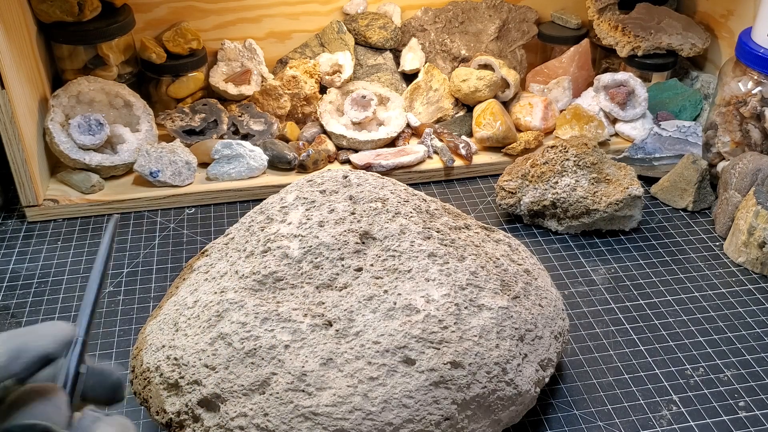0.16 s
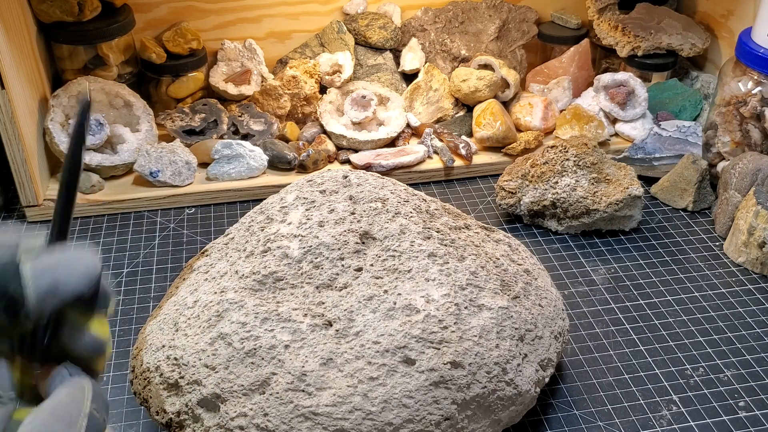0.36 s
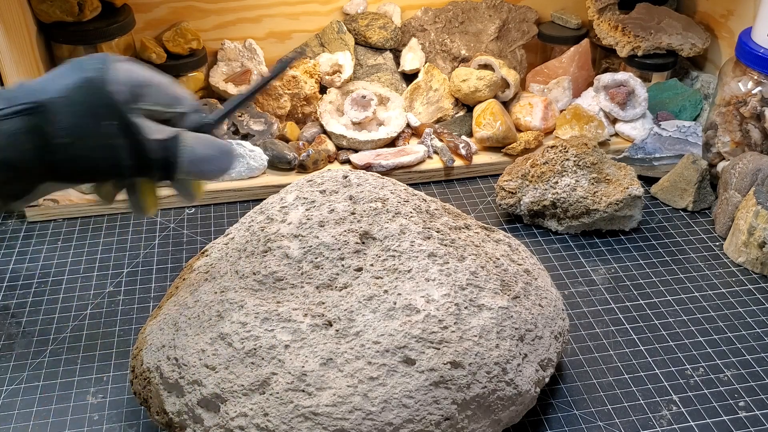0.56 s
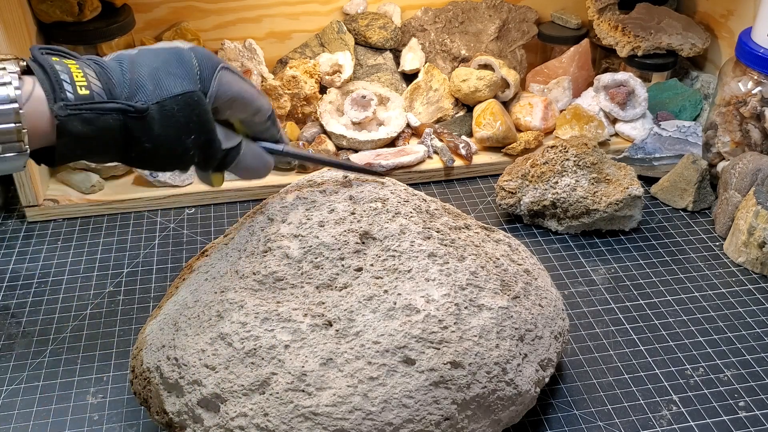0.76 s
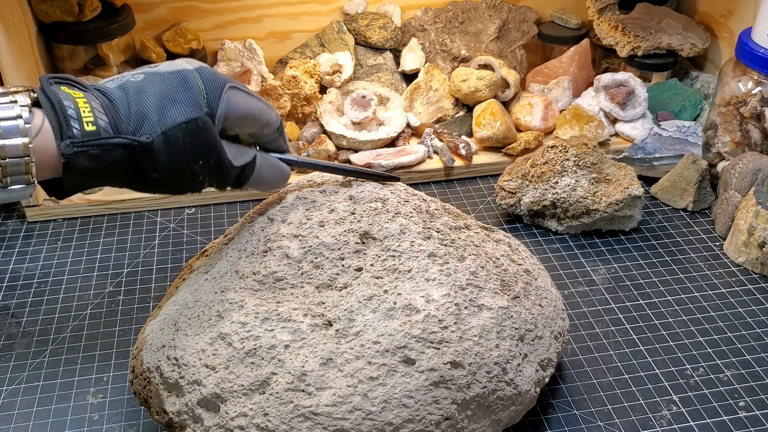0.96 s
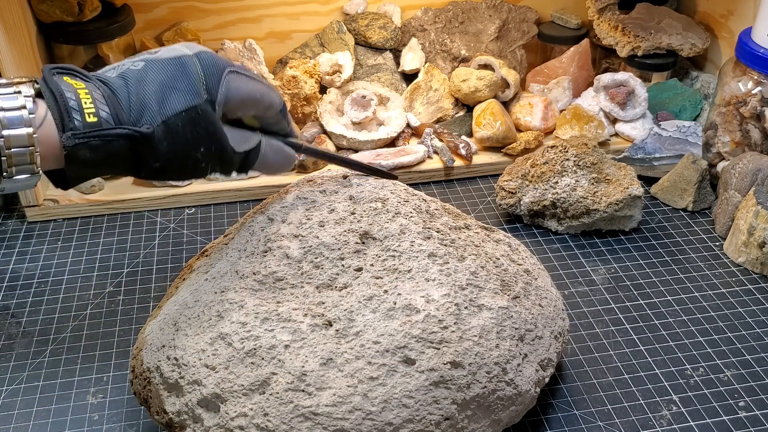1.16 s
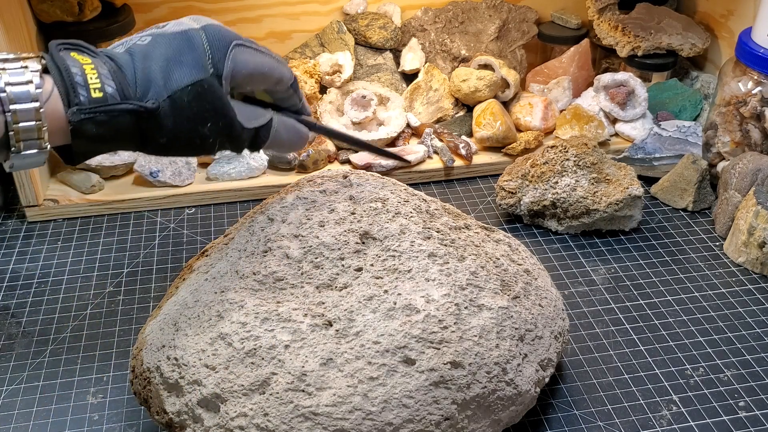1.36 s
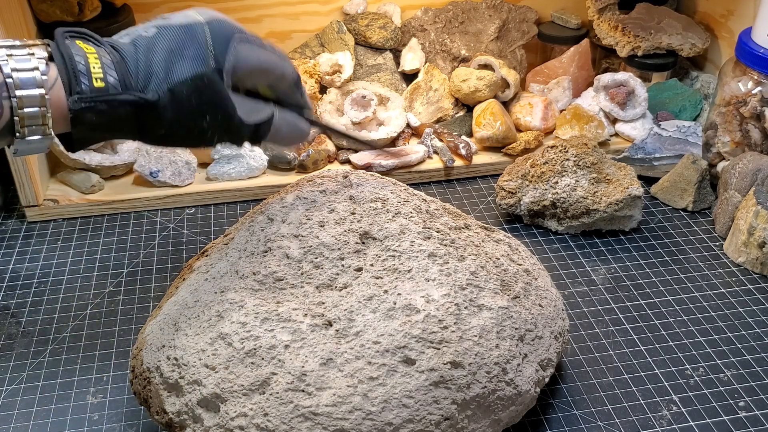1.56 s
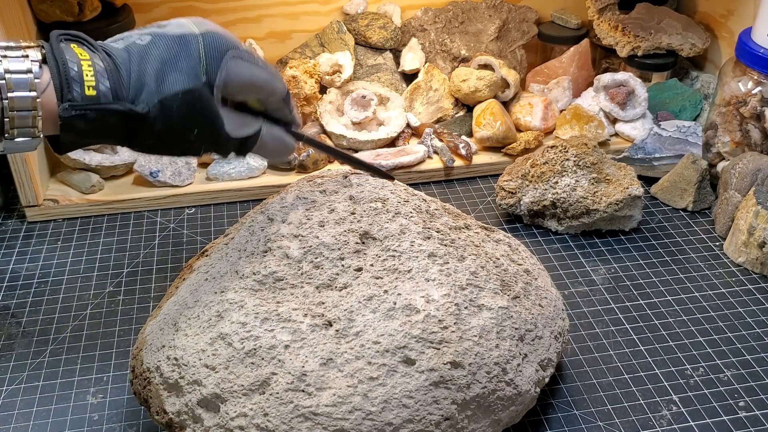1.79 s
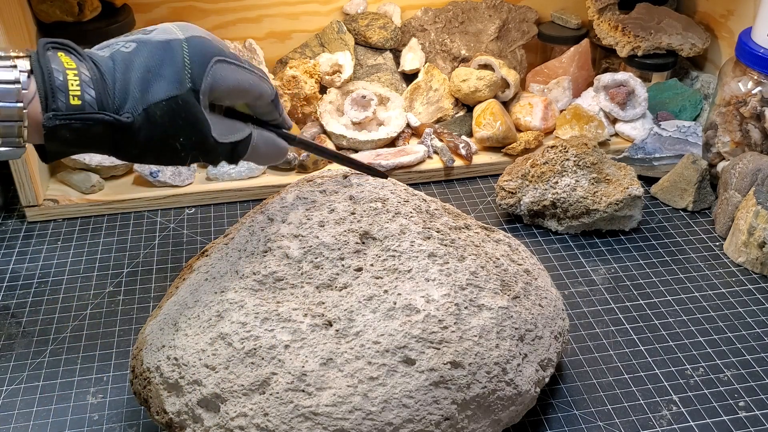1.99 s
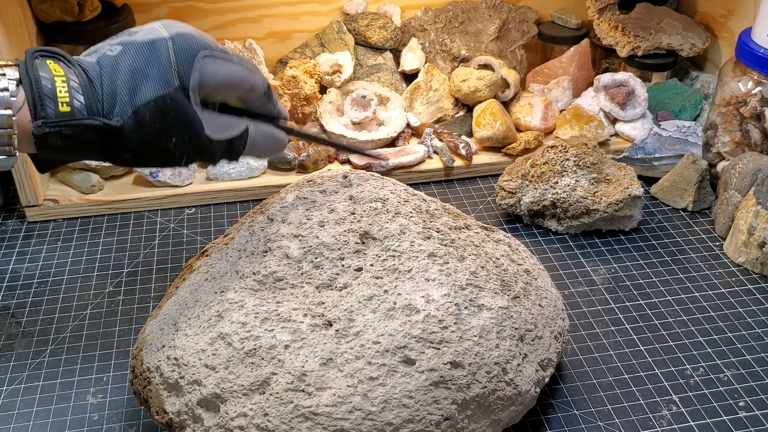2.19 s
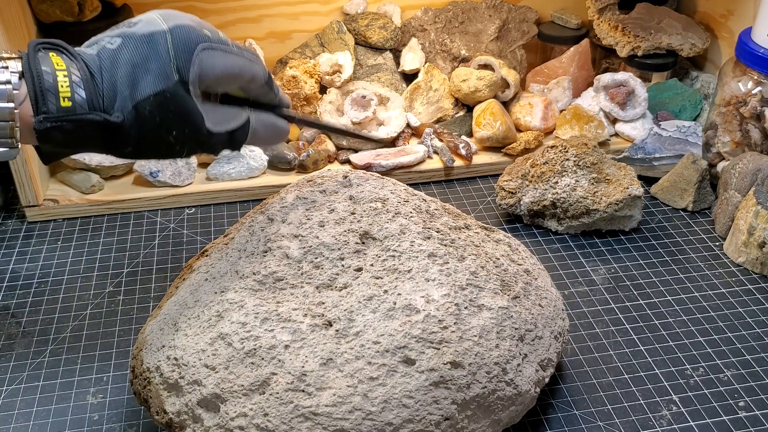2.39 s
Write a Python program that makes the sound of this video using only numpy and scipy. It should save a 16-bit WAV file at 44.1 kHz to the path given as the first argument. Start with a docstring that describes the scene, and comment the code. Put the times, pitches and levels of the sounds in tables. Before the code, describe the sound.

Thin metal rod taps a porous rock, one loud clink then uneven softer tinny taps

```python
"""A thin steel tool taps a large porous rock on a workbench in a small workshop.
A strong tap opens over low room rumble and hiss: filtered noise cracks, decaying sines knock, clink and ring.
From 0.25 s a glove and watch strap rustle: grained noise under short band-noise ticks.
From 0.83 s nine more taps follow to 2.36 s, with two faint ticks among them.
Grit, knock, rings and ticks also feed a noise-like room tail."""
import sys
import numpy as np
from scipy import signal
from scipy.fft import rfft, irfft
from scipy.io import wavfile
from scipy.ndimage import uniform_filter1d

SR = 44100
rng = np.random.default_rng(int(sys.argv[2]) if len(sys.argv) > 2 else 0)


def voltage_ratio(level):
    """Linear amplitude factor for a level in decibels (scalar or array-like)."""
    return 10 ** (np.asarray(level, float) / 20)


def wrap_up_sound(samples):
    """Save the sound to the file named by the first command line argument, as 16-bit audio."""
    columns = np.atleast_2d(samples).T
    # keep every value between -1 and 1, then stretch to whole-number steps
    tamed = np.clip(columns, -1, 1)
    steps = np.round(tamed * 32767).astype(np.int16)
    wavfile.write(sys.argv[1], SR, steps)


N = 107383

# taps: start_s, crack_db, rock_db, tool_low_db, tool_high_db, rock_tilt_db_per_octave,
# crack_tilt_db_per_octave, thud_db, knock_db, grit_peak_hz, grit_peak_db; dB before direct and room gains
TAPS = [(-0.004, -31.5, -45, -24, -35.5, -11, 2, -64, -46, 5940, 2),
        (0.825, -62.5, -95, -56, -76, -28, 4, -70, -69, 5300, 5),
        (1.017, -50.5, -51, -36.5, -51.5, -1, -4, -41, -54, 4380, 7),
        (1.227, -41, -37.5, -33, -45.5, 2, -3, -36, -48.5, 3920, 9.5),
        (1.563, -47, -48.5, -45.5, -63, -8.5, -4, -70.5, -56, 11340, 11.5),
        (1.743, -50, -65.5, -53, -56, 11, 1, -83, -56.5, 9500, 4),
        (1.882, -48, -55.5, -52.5, -53, -5, 4, -71, -63, 5840, 14),
        (2.054, -48, -44.5, -50.5, -57, -2, -4, -68, -61, 8100, 9.5),
        (2.214, -43, -39.5, -41, -62, 5.5, -3, -62, -57, 4070, 7.5),
        (2.359, -47, -52.5, -49, -52, 6.5, -4, -66, -61.5, 7210, 5)]
# tilt of the tool's high modes, one per tap: tilt_db_per_octave
TOOL_HIGH_TILT = [17, 0, -7, 5, 22, -4, -4, -6, -11, 4]

# grit crack spectrum, before tilt and peak: freq_hz, density_db_per_hz
CRACK_SPECTRUM = [(400, -13), (1200, -10.5), (2600, -13.5), (3600, -10), (5000, -3), (7000, -8.5),
                  (9800, 2.5), (11500, -5.5), (14000, -17.5), (15000, -18), (15800, -56)]
CRACK_RISE_S, CRACK_T60_S, CRUMBLE_DB, CRUMBLE_T60_S = 0.0026, 0.03, -13, 0.14
GRIT_PEAK_OCTAVES = 0.31  # half-width at 1/e of the dB hump

# stony knock mode frequencies: mode_hz
KNOCK_HZ = [560, 700, 860, 1020]
# stony knock modes: relative_db, t60_s, rise_s
KNOCK_MODES = [(-6.5, .05, 0.0019), (-1, 0.055, 0.0024), (-0.5, 0.043, .002), (-6.5, 0.033, .002)]
# rock mode frequencies: mode_hz
ROCK_HZ = [1314, 2031, 2196, 2262, 2416, 2632, 3090, 3159, 3340, 3600, 3846, 4112, 4441, 4630, 4722, 5044,
           5502, 6305]
# rock modes, before tilt: relative_db, t60_s, rise_s
ROCK_MODES = [(-4, .3, 0.0021), (-9, .2, 0.0046), (8, 0.21, 0.016), (-10, 0.186, 0.014), (-8, .2, 0.0089),
              (-8.5, 0.13, .008), (-21.5, 0.23, .005), (-17.5, 0.161, .005), (-12.5, 0.19, 0.0019),
              (-14, 0.14, 0.0018), (-2.5, 0.11, 0.0029), (-14.5, 0.26, 0.0093), (-3.5, 0.1, 0.0047),
              (-18.5, 0.14, 0.0058), (-15, 0.14, .005), (-19.5, 0.085, .002), (-16.5, .08, 0.0026),
              (-20.5, 0.067, .002)]
# tool low mode frequencies: mode_hz
TOOL_LOW_HZ = [1454, 1456, 1426, 3160]
# tool low modes: relative_db, t60_s, rise_s
TOOL_LOW_MODES = [(4, 0.08, 0.0016), (-6, 0.32, .004), (-9.5, 0.066, .002), (-20.5, 0.21, 0.0012)]
# tool high mode frequencies: mode_hz
TOOL_HIGH_HZ = [5658, 7461, 9911, 9800, 13630, 13670]
# tool high modes, before tilt: relative_db, t60_s, rise_s
TOOL_HIGH_MODES = [(-11, 0.051, 0.00063), (-12, 0.13, .001), (-1, 0.142, 0.00076), (-1.5, .07, .001),
                   (0, .11, .001), (-8, 0.079, .001)]
# bench mode frequencies: mode_hz
BENCH_HZ = [84, 250]
# bench modes: relative_db, t60_s, rise_s
BENCH_MODES = [(4.5, .3, .003), (-30, .12, 0.0053)]
FLUTTER_RMS_DB = 4
DROP_AT_S, DROP_DB, DROP_WIDTH_S = 0.105, -13, 0.008  # low rings, time from the blow

# room decay: freq_hz, t60_s
ROOM_T60 = [(300, 0.32), (1500, 0.3), (4000, 0.18), (9000, 0.12), (15000, 0.083)]
ROOM_BUILD_S = 0.0021
NOISY_DIRECT_DB, NOISY_ROOM_DB = 5, 7
HIGH_ROOM_DB, RING_ROOM_DB, RUSTLE_ROOM_DB = -2, -13, -8

# rumble resonances: centre_hz, width_hz (full, at -6 dB), relative_db
RUMBLE_HUMPS = [(55.1, 14, 3.5), (80, 27, 0), (40, 20, -12.5), (111, 35, -11.5)]
# rumble level: time_s, level_db
RUMBLE_LEVEL = [(0.0, -35.5), (0.21, -47.5), (0.83, -42), (1.19, -47.5), (1.24, -42), (1.53, -54),
                (1.64, -44), (1.71, -55), (1.75, -43), (2.03, -50), (2.08, -45.5), (2.43, -47)]
# dull hiss spectrum: freq_hz, density_db_per_hz
DULL_SPECTRUM = [(100, -32), (140, -8.5), (185, -5.5), (264, -7.5), (300, -11), (490, -22), (750, -27),
                 (1100, -30), (1500, -34), (1750, -46.5), (2500, -56)]
# dull hiss level, before DULL_GAIN_DB: time_s, level_db
DULL_LEVEL = [(0.0, -53.5), (0.47, -57), (0.64, -56.5), (0.8, -56), (1.19, -55.5), (1.38, -59.5),
              (1.63, -65), (1.74, -57.5), (2.43, -61)]
DULL_GAIN_DB = 3.0
# faint bright hiss spectrum: freq_hz, density_db_per_hz
BRIGHT_SPECTRUM = [(1500, -7.5), (2500, -10), (5200, -11), (10000, -12.5), (14900, -14)]
BRIGHT_DB = -82.5

# sleeve and glove friction: time_s, level_db
FRICTION_LEVEL = [(0.25, -89), (0.358, -77), (0.538, -81.5), (0.776, -77.5), (1.0, -100)]
# friction spectrum: freq_hz, density_db_per_hz
FRICTION_SPECTRUM = [(1180, -36.5), (2000, -11), (5080, -6), (6700, -8.5), (7660, -15), (10200, -10),
                     (14900, -19.5)]
# ticks and rustles of glove, strap and grit:
# start_s, level_db, centre_hz, width_hz (full, at -6 dB), rise_s, t60_s
RUSTLES = [(.3125, -56.5, 7000, 4700, 0.00088, 0.052), (.331, -53.5, 9200, 8700, 0.0015, 0.026),
           (0.333, -47, 9550, 486, 0.0026, 0.066), (0.3638, -40.5, 11000, 5600, .0002, 0.0046),
           (.44, -66.5, 9700, 1500, 0.0011, 0.072), (.455, -65, 6700, 1190, 0.022, 0.11),
           (.46, -71, 4680, 1480, 0.023, 0.15), (.465, -67, 9600, 2980, .015, .1),
           (.33, -63, 1130, 506, 0.0046, 0.34), (.614, -67.5, 6700, 6000, 0.00093, 0.048),
           (.638, -49.5, 384, 347, 0.0052, 0.12), (0.7069, -53.5, 880, 1180, 0.0015, 0.01),
           (0.7058, -60, 6000, 7000, 0.00032, 0.0065), (1.705, -61.5, 9750, 3440, 0.00037, .06),
           (1.985, -69.5, 6600, 2500, 0.00067, 0.039)]


def evened(x):
    """Scales to rms 1."""
    return x / np.sqrt(np.mean(x ** 2) + 1e-20)


def read(points, hz):
    """Reads a spectrum table on a log-frequency axis."""
    f, value = np.transpose(points)
    return np.interp(np.log(hz + 1), np.log(f + 1), value)


def octaves(hz, ref_hz):
    """Distance from ref_hz in octaves, safe at 0 Hz."""
    return np.log2((hz + 1) / ref_hz)


def level(curve):
    """Gain over time; -120 dB outside a curve that starts after 0.1 s or ends before 2 s."""
    s, db = np.transpose(curve)
    before_db = -120 if s[0] > 0.1 else db[0]
    after_db = -120 if s[-1] < 2 else db[-1]
    return voltage_ratio(np.interp(np.arange(N) / SR, s, db, left=before_db, right=after_db))


def add(mix, start_s, sound):
    """Mixes a sound in at a time; what lies before zero is lost."""
    at = round(start_s * SR)
    part, sound = mix[max(at, 0):], sound[max(-at, 0):]
    part[:len(sound)] += sound[:len(part)]


def noise(size, colour_db):
    """Noise of rms 1 whose spectrum is shaped by colour_db(hz)."""
    spectrum = rfft(rng.standard_normal(size))
    gain = voltage_ratio(colour_db(np.fft.rfftfreq(size, 1 / SR)))
    return evened(irfft(spectrum * gain, size))


def ring(mode_hz, modes, t, tilt_db=0., pivot_hz=2196):
    """Sine modes struck at once, each with its own rise and exponential decay."""
    hz = np.array(mode_hz)[:, None]
    db, t60_s, rise_s = np.transpose(modes)[:, :, None]
    decay = voltage_ratio(db + tilt_db * np.log2(hz / pivot_hz) - 60 * t / t60_s)
    wave = np.sin(2 * np.pi * (hz * t + rng.random(hz.shape)))  # random phases
    return ((1 - np.exp(-t / rise_s)) * decay * wave).sum(0)


def room(x):
    """Tail of sparse random impulses, each band dying at its own speed; tail energy 1."""
    size = SR // 2
    impulses, at = np.zeros(size), np.arange(40, size - 20, 20)
    impulses[at + rng.integers(0, 20, len(at))] = rng.choice([-1., 1.], len(at))
    impulses *= 1 - np.exp(-np.arange(size) / SR / ROOM_BUILD_S)
    hz, t, z = signal.stft(impulses, SR, nperseg=256)
    decay = voltage_ratio(-60 * t / read(ROOM_T60, hz)[:, None])
    tail = signal.istft(z * decay, SR, nperseg=256)[1]
    return signal.fftconvolve(x, tail / np.linalg.norm(tail))[:len(x)]


def grit(t, tilt_db, peak_hz, peak_db):
    """Grit cracks and crumbles: shaped noise with a fast and a slow decay."""
    def colour_db(hz):
        hump_db = peak_db * np.exp(-(octaves(hz, peak_hz) / GRIT_PEAK_OCTAVES) ** 2)
        return read(CRACK_SPECTRUM, hz) + tilt_db * octaves(hz, 4000) + hump_db

    crack = voltage_ratio(-60 * t / CRACK_T60_S)
    crumble = voltage_ratio(CRUMBLE_DB - 60 * t / CRUMBLE_T60_S)
    return noise(len(t), colour_db) * np.minimum(t / CRACK_RISE_S, 1) * (crack + crumble)


def low_rings(t, rock_db, rock_tilt_db, tool_db):
    """Rock and low tool modes with their room tail, dropping sharply around DROP_AT_S."""
    rings = voltage_ratio(rock_db) * ring(ROCK_HZ, ROCK_MODES, t, rock_tilt_db)
    rings += voltage_ratio(tool_db) * ring(TOOL_LOW_HZ, TOOL_LOW_MODES, t)
    drop = voltage_ratio(DROP_DB / (1 + np.exp((DROP_AT_S - t) / DROP_WIDTH_S)))
    return (rings + voltage_ratio(RING_ROOM_DB) * room(rings)) * drop


def high_ring(t, db, tilt_db):
    """High tool modes whose common level flutters at random."""
    wander = uniform_filter1d(rng.standard_normal(len(t)), size=150)
    flutter_db = FLUTTER_RMS_DB * evened(uniform_filter1d(wander, size=150))
    return voltage_ratio(db + flutter_db) * ring(TOOL_HIGH_HZ, TOOL_HIGH_MODES, t, tilt_db, 9911)


def tap(crack_db, rock_db, low_db, high_db, rock_tilt_db, crack_tilt_db,
        thud_db, knock_db, peak_hz, peak_db, high_tilt_db):
    """One blow: grit cracks, stone knocks, rock and tool ring, bench thuds."""
    t = np.arange(16384) / SR
    noisy = voltage_ratio(crack_db) * grit(t, crack_tilt_db, peak_hz, peak_db)
    noisy += voltage_ratio(knock_db) * ring(KNOCK_HZ, KNOCK_MODES, t)
    rings = low_rings(t, rock_db, rock_tilt_db, low_db)
    high = high_ring(t, high_db, high_tilt_db)
    thud = voltage_ratio(thud_db) * ring(BENCH_HZ, BENCH_MODES, t)
    tail = room(voltage_ratio(NOISY_ROOM_DB) * noisy + voltage_ratio(HIGH_ROOM_DB) * high)
    return voltage_ratio(NOISY_DIRECT_DB) * noisy + tail + high + rings + thud


def rumble():
    """Low room rumble: noise in a few broad resonances."""
    def colour_db(hz):
        power = sum(voltage_ratio(db) ** 2 / (1 + (2 * (hz - centre_hz) / width_hz) ** 2) ** 2
                    for centre_hz, width_hz, db in RUMBLE_HUMPS)
        return 10 * np.log10(power)

    return level(RUMBLE_LEVEL) * noise(N, colour_db)


def hiss():
    """A dull band of noise with a moving level, and a faint steady bright one."""
    dull = noise(N, lambda hz: read(DULL_SPECTRUM, hz) - 40 * ((hz < 110) | (hz > 2500)))
    bright = noise(N, lambda hz: read(BRIGHT_SPECTRUM, hz) - 40 * (hz < 1500))
    return level(DULL_LEVEL) * voltage_ratio(DULL_GAIN_DB) * dull + voltage_ratio(BRIGHT_DB) * bright


def friction():
    """Cloth and glove brush softly: noise in uneven grains."""
    grains = voltage_ratio(2 * evened(uniform_filter1d(rng.standard_normal(N), size=300)))  # 2 dB rms
    brush = noise(N, lambda hz: read(FRICTION_SPECTRUM, hz) - 60 * (hz < 1500))
    return level(FRICTION_LEVEL) * evened(grains * brush)


def rustle(db, centre_hz, width_hz, rise_s, t60_s):
    """A short burst of noise in one band: linear rise, exponential decay."""
    t = np.arange(8192) / SR
    burst = noise(len(t), lambda hz: -20 * np.log10(1 + (2 * (hz - centre_hz) / width_hz) ** 2))
    return burst * np.minimum(t / rise_s, 1) * voltage_ratio(db - 60 * np.maximum(t - rise_s, 0) / t60_s)


def scene():
    """Taps and rustles in the room, over rumble, hiss and friction."""
    taps, small = np.zeros(N), np.zeros(N)
    for (start_s, *settings), high_tilt_db in zip(TAPS, TOOL_HIGH_TILT):
        add(taps, start_s, tap(*settings, high_tilt_db))
    for start_s, *settings in RUSTLES:
        add(small, start_s, rustle(*settings))
    small_in_room = small + voltage_ratio(RUSTLE_ROOM_DB) * room(small)
    return (taps + rumble() + hiss() + friction() + small_in_room)[None]


def low_pass(x):
    """Removes everything above the highest recorded frequency."""
    return signal.sosfilt(signal.butter(12, 15030, fs=SR, output="sos"), x)


def record(dry):
    """Returns the finished mix as recorded."""
    return low_pass(dry)


dry = scene()
out = record(dry)
wrap_up_sound(out)
```